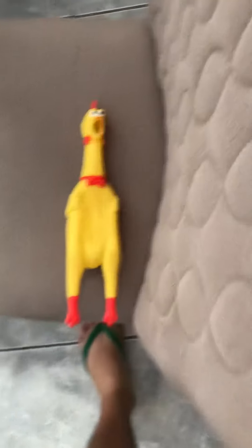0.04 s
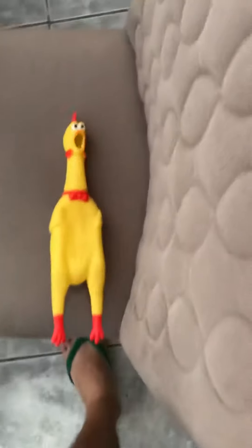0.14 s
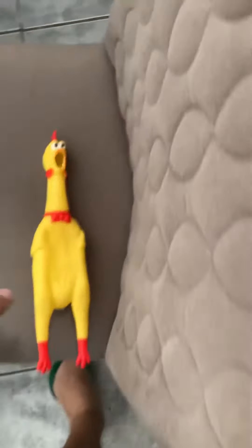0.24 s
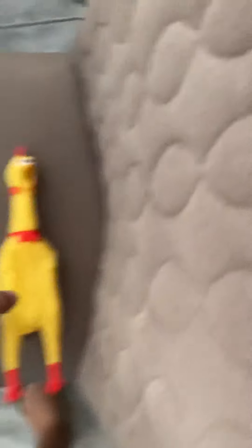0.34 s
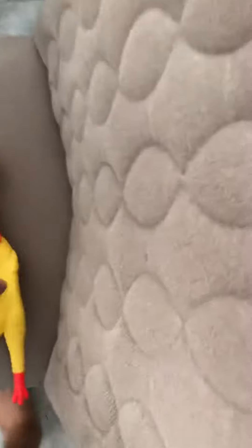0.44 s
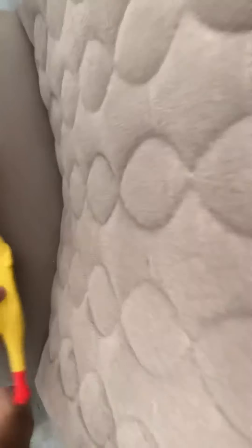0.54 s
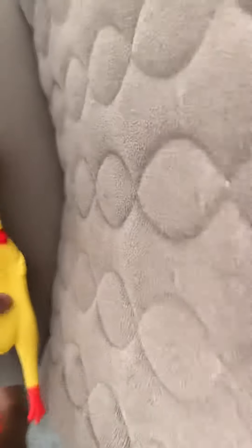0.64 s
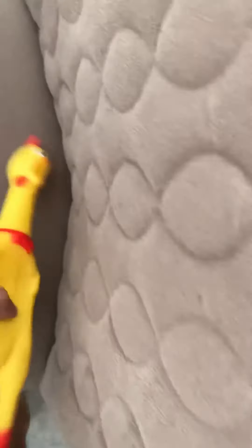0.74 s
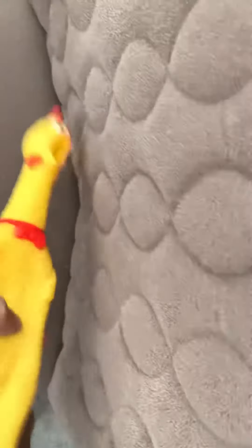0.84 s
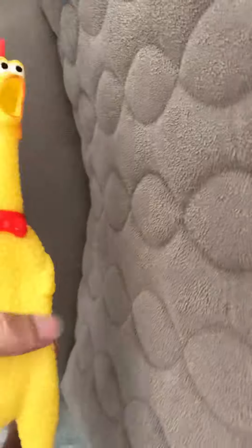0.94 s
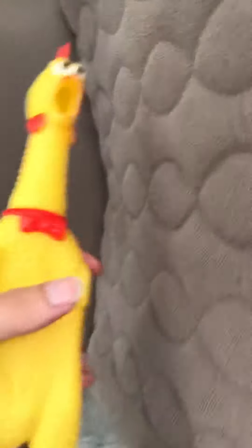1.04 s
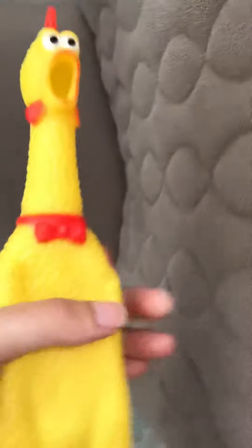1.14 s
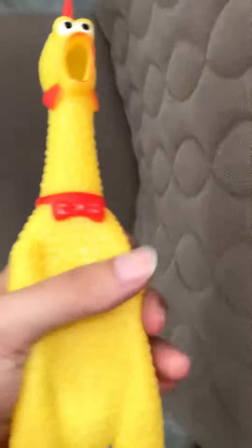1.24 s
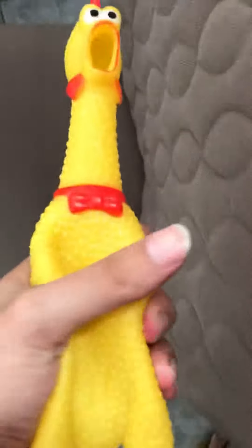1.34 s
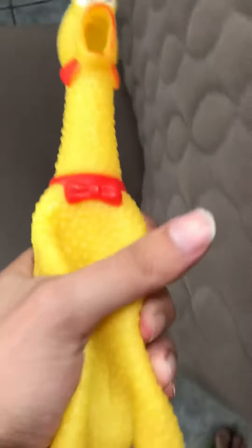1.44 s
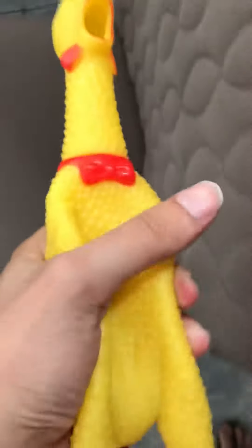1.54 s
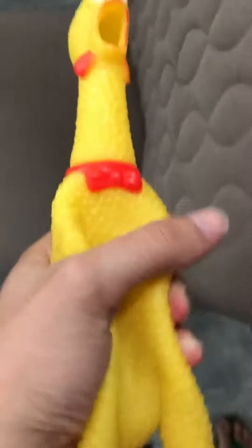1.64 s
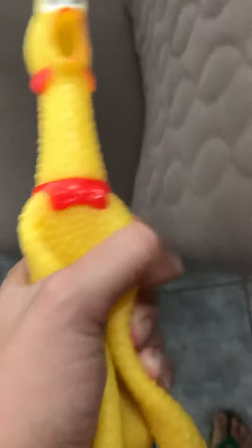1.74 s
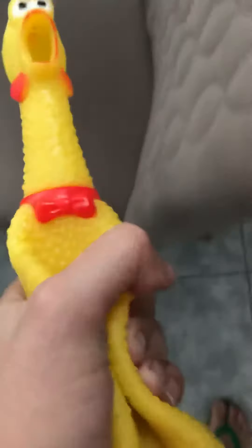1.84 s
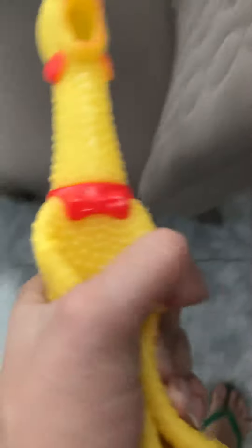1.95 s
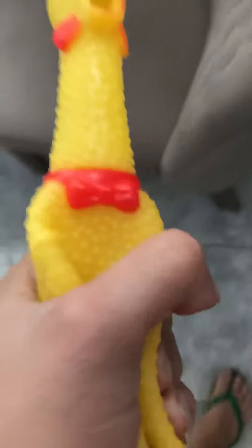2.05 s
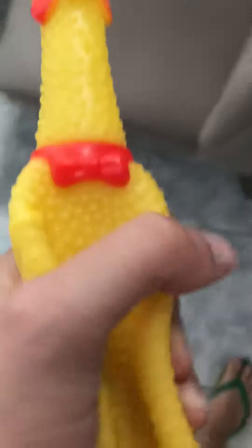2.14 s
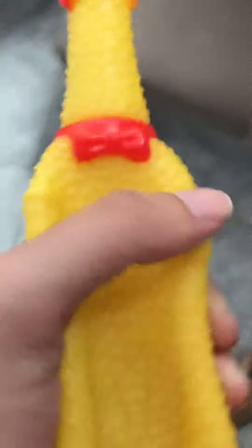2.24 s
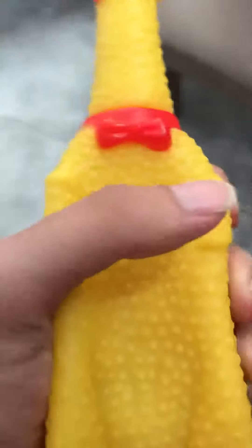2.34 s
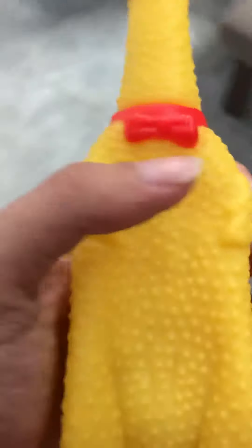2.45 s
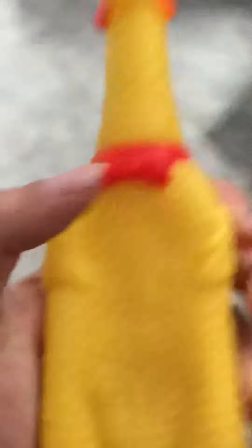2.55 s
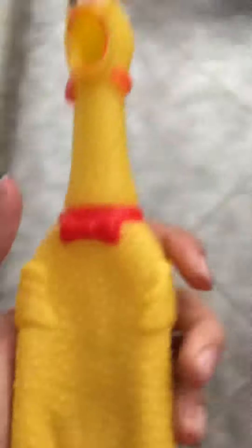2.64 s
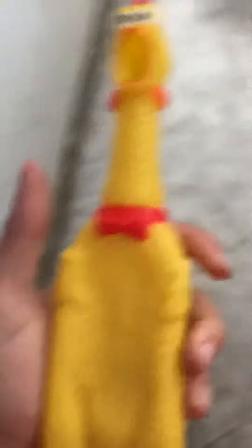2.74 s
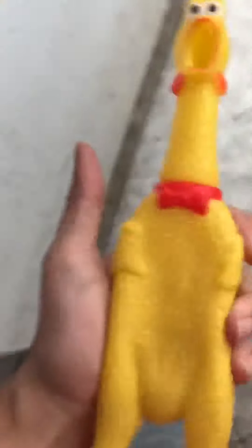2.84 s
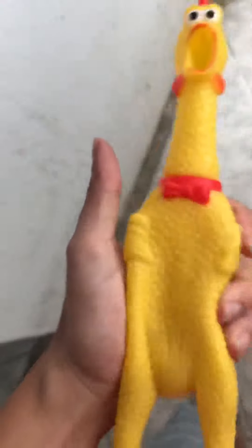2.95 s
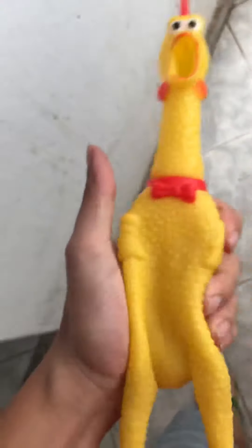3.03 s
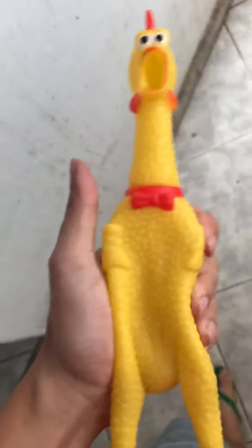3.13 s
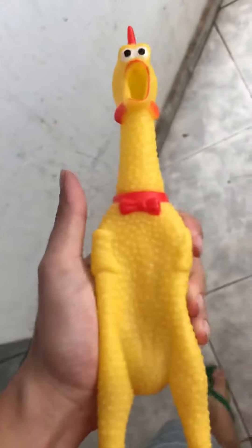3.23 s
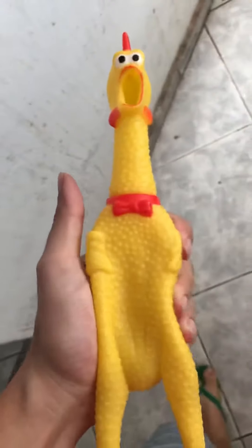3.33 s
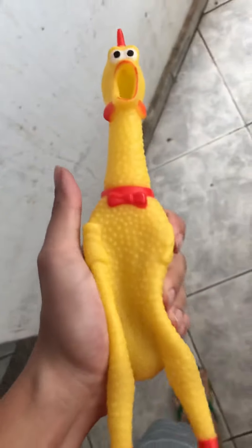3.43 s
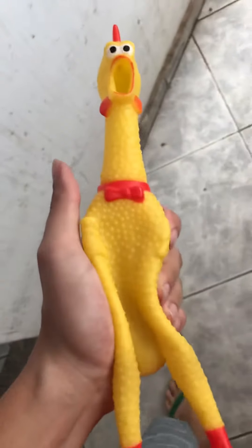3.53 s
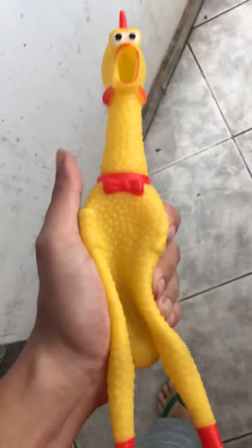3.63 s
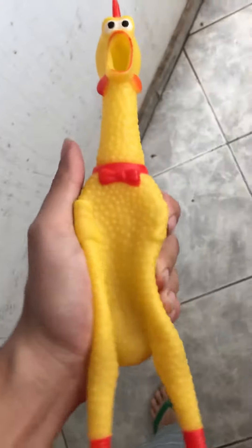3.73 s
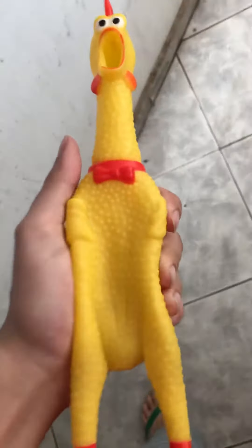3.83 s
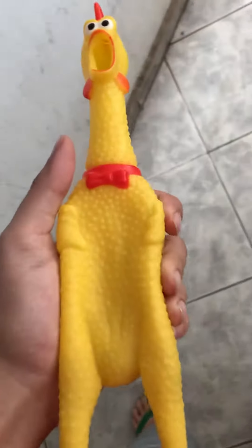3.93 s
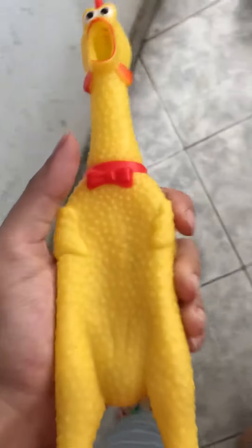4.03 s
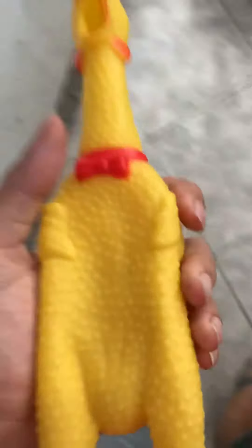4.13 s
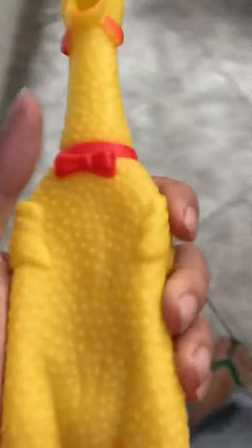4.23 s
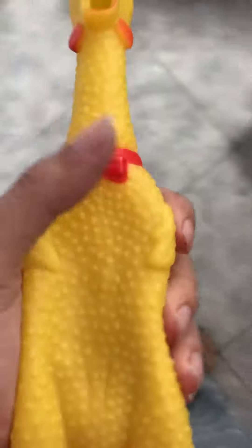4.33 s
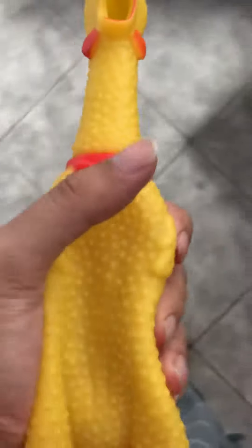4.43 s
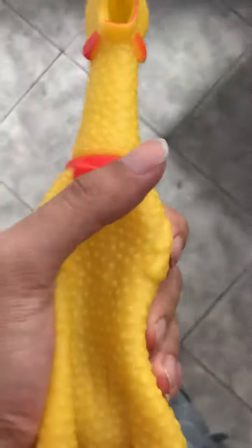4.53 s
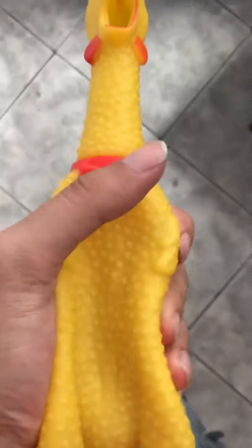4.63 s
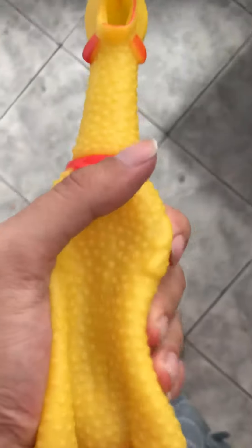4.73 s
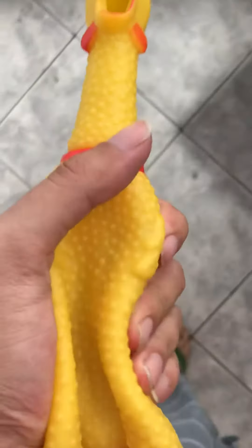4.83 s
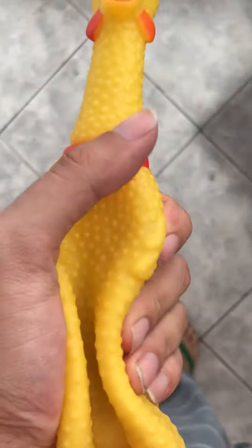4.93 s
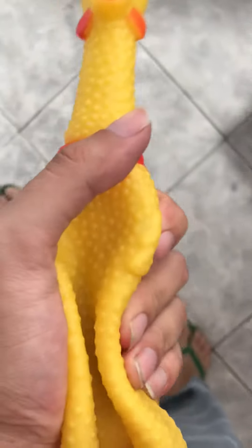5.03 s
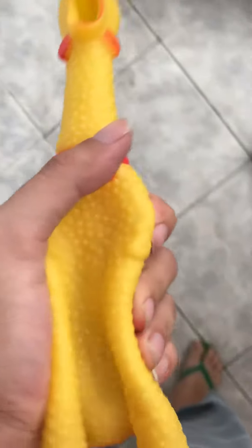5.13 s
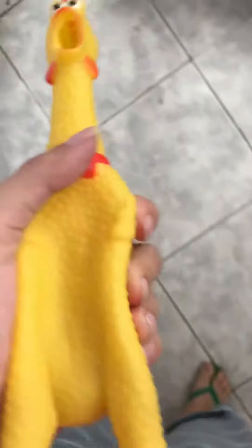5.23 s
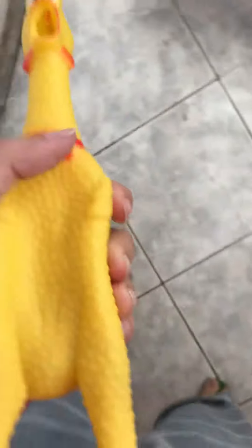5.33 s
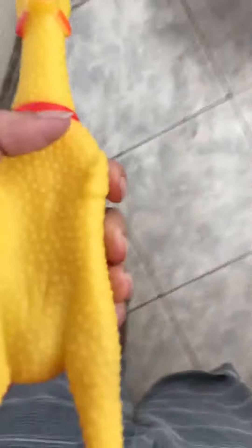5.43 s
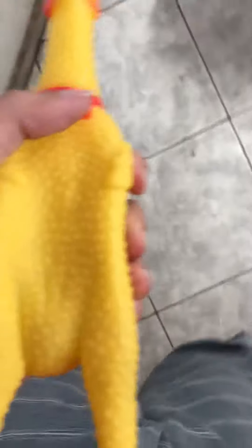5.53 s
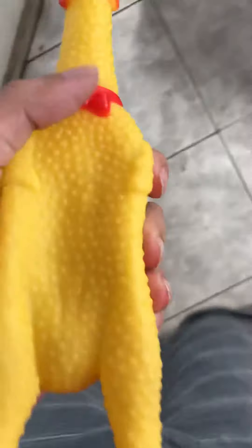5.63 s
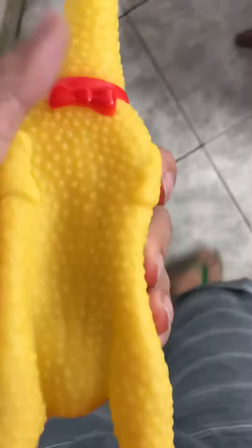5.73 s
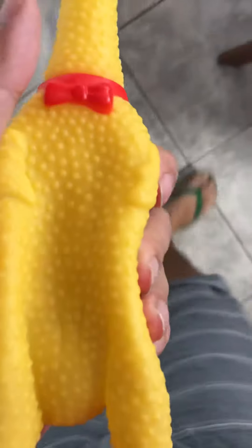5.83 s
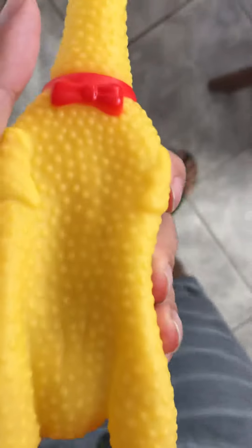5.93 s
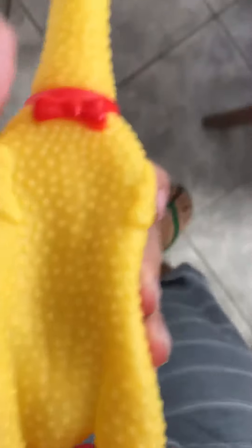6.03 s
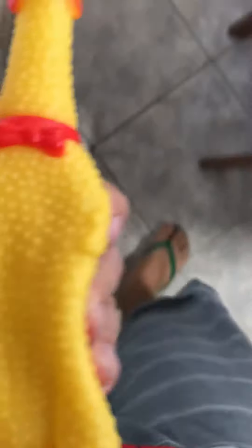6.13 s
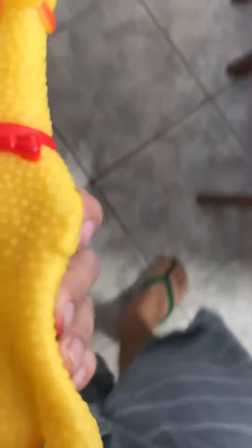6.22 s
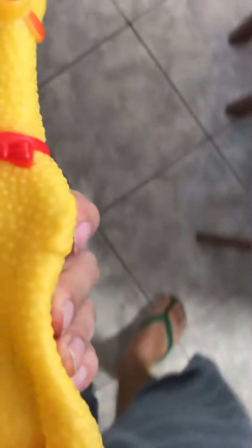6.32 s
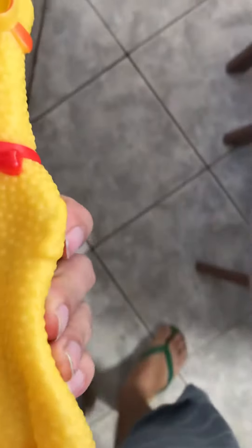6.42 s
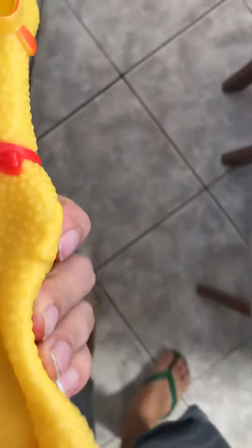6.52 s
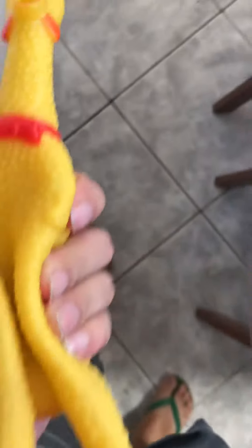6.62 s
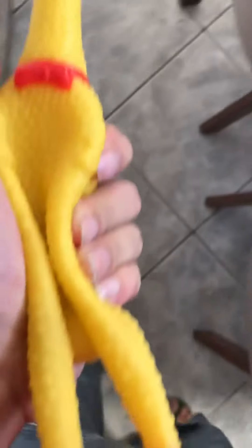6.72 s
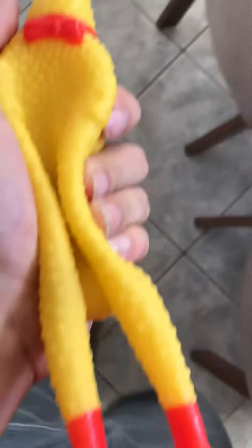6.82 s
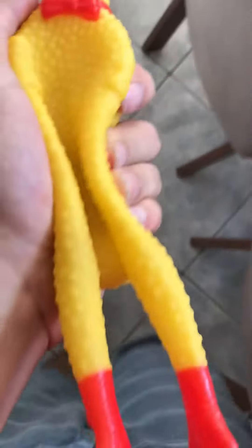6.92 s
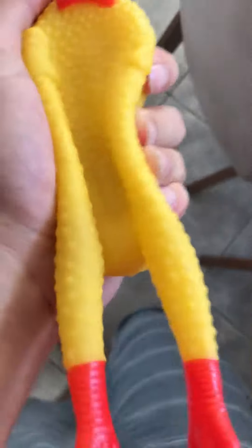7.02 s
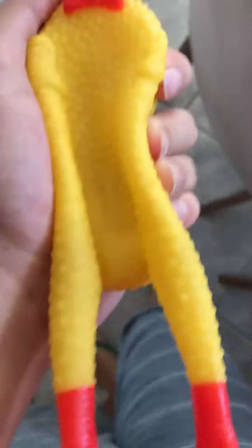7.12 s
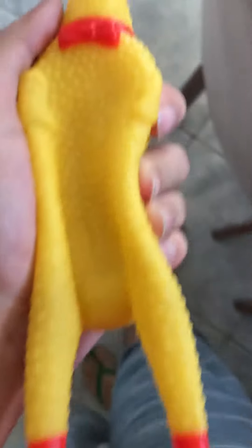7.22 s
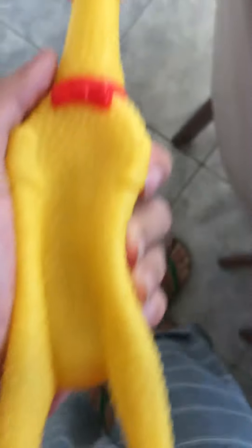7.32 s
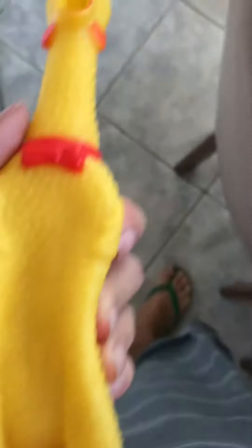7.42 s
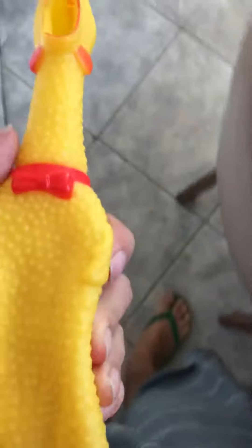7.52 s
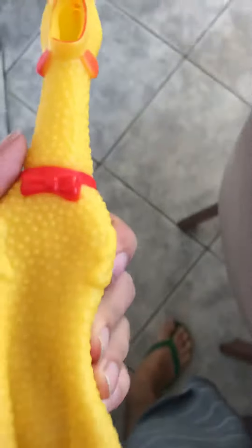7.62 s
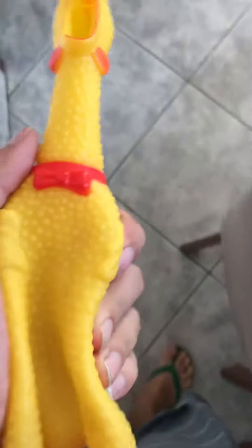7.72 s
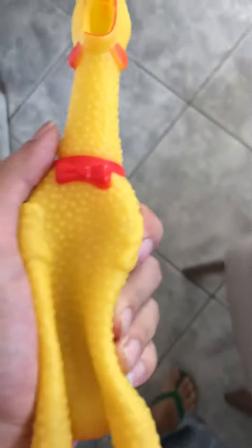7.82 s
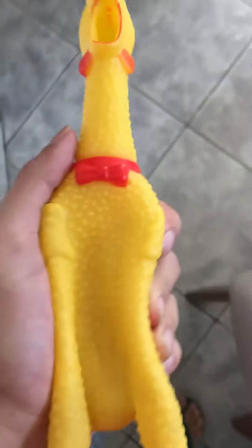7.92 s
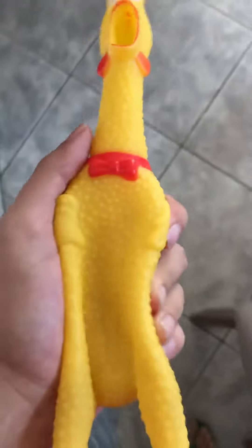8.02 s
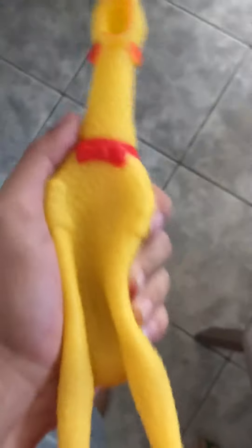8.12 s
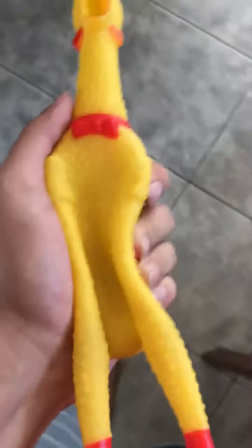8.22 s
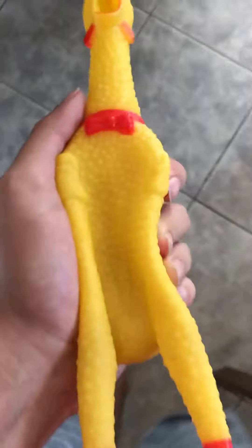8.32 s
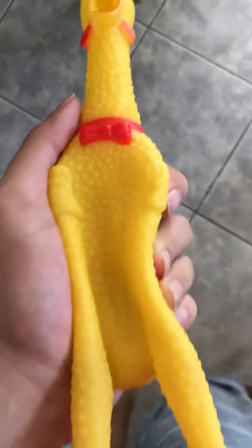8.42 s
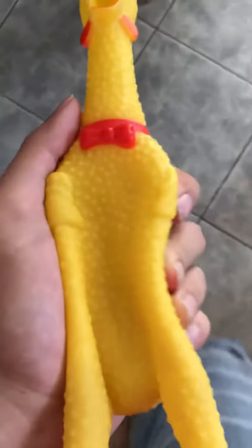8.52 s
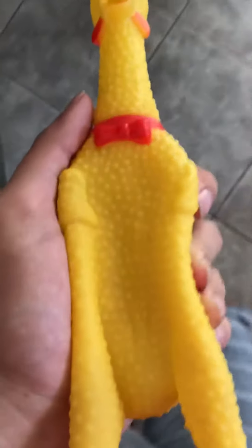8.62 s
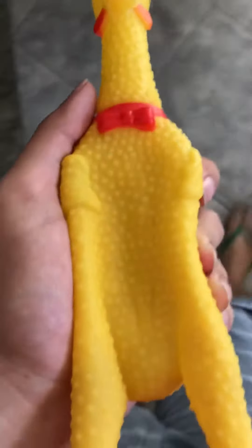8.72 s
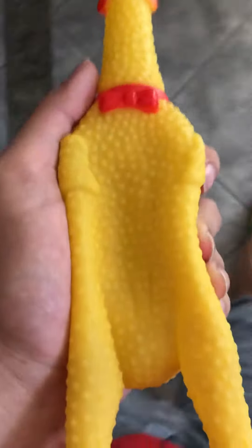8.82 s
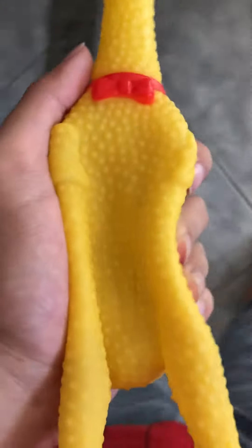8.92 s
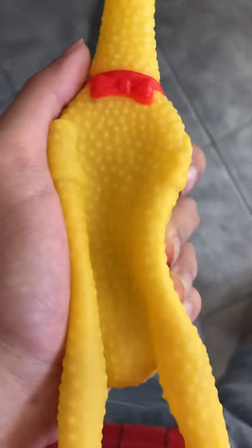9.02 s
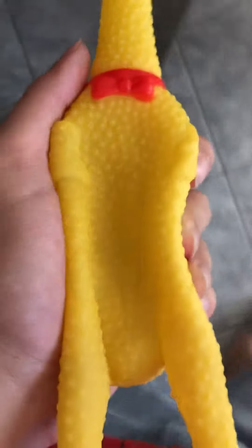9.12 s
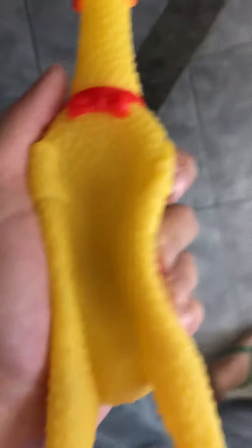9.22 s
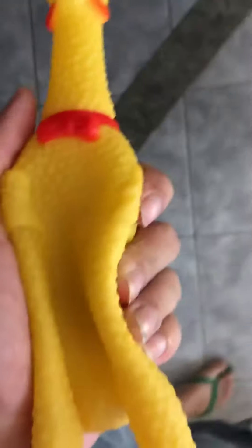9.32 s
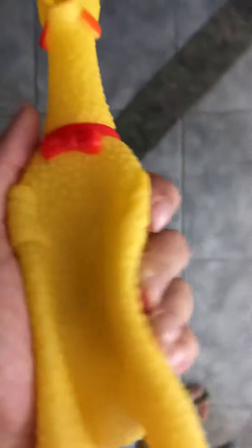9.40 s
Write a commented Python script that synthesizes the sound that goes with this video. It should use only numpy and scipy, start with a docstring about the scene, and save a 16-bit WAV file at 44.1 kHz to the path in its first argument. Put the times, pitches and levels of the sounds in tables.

```python
"""A soft rustle of cloth and faint whines open the scene, over a low hum and far traffic that never stop.
Then a rubber chicken is squeezed again and again, close to a phone in a tiled living room.
Air pushed out buzzes a reed in its neck, higher the harder the squeeze; from two seconds on, air sucked
back in sounds a lower, flatter groan between squeezes. The neck tube and beak colour both.
Meanwhile slow air hisses, the body knocks, the hand bumps the phone, and the hard room echoes the toy."""
import sys
import numpy as np
from scipy import signal
from scipy.fft import rfft, irfft
from scipy.io import wavfile
from scipy.ndimage import uniform_filter1d, map_coordinates

SR = 44100
rng = np.random.default_rng(int(sys.argv[2]) if len(sys.argv) > 2 else 0)


def store_wav(level_fs):
    """Save 16-bit WAV to argv[1]."""
    pcm = np.round(np.clip(np.atleast_2d(level_fs), -1, 1) * 32767)
    wavfile.write(sys.argv[1], SR, pcm.T.astype(np.int16))


N = 417186
TIME = np.arange(N) / SR


def chicken():
    """One reed sounds in both directions of flow: squeezed air out, drawn air in."""
    # squeezes: (start [s], crest [s], end [s], crest pitch aimed at [Hz], end pitch before choking [Hz],
    # hold [over 1 lingers at the crest], level offset [dB], fade over the stroke [dB],
    # shrillness offset [dB], low note boost [dB], top boost [dB])
    squeeze_rows = [ (0.605, 0.63, .722, 524.5, 476, .97, -1.5, 6, -2, 10, -5),
                    (1.259, 1.394, 1.492, 715, 507, .8, -0.5, 9.5, 0, 4.5, 4.5),
                    (1.614, 1.719, 1.978, 649.5, 495, .99, -1.5, 0.5, 0, 3.5, 2),
                    (2.903, 3.002, 3.102, 592, 504.4, .87, 1, 3, -0.5, 4.5, 2.5),
                    (3.337, 3.432, 3.64, 602.4, 506, .7, -0.5, 5.5, 0, 3, 2.5),
                    (4.395, 4.484, 4.585, 582.6, 496, .93, 1, 3.5, 1, 0.5, 2),
                    (4.727, 4.8, 5.02, 575.9, 496, 1.98, 1.5, 2.5, 0.5, 1, -0.5),
                    (6.111, 6.191, 6.312, 575.8, 492, .83, 2, 6.5, 0, 2, 1),
                    (6.483, 6.586, 6.752, 593, 480.4, .62, 0.5, 6.5, -1, 2, 0),
                    (7.617, 7.695, 7.836, 552.3, 490, 2.06, 2, 3.5, -0.5, 3.5, -0.5),
                    (8.046, 8.095, 8.218, 541.3, 485.4, .81, 0.5, 3, -.5, 2.5, -1),
                    (8.902, 8.955, 9.052, 552, 491, 1.05, 1.5, 4, 1, 3, -6),
                    (9.234, 9.274, 9.358, 541, 489, 1.04, 1, 4.5, 1.5, 1, -4), ]
    # refills as the body springs back, with the same columns:
    # (start [s], crest [s], end [s], crest pitch aimed at [Hz], end pitch before choking [Hz], hold [-],
    # level offset [dB], fade [dB], shrillness offset [dB], low note boost [dB], top boost [dB])
    refill_rows = [ (2.061, 2.222, 2.83, 543.8, 466.9, 0.31, -1.5, 3.5, 0.32, 5, 5),
                   (3.711, 3.802, 4.263, 490.1, 458.8, 1.82, -0.5, 1, -1.9, -6.5, 7.5),
                   (5.104, 5.195, 5.625, 504.5, 456, 1.17, -2.5, 3, 0.9, 3.5, 2),
                   (6.975, 7.044, 7.253, 486.8, 447, 0.9, -1.5, 7, -0.19, 0.5, -2),
                   (7.491, 7.497, 7.56, 471.6, 472, 1.25, 0.5, 4.5, -1.75, 2.5, 11),
                   (7.903, 7.958, 8.008, 486.4, 479, 1.42, -1, 1, -0.06, 2, 8),
                   (8.572, 8.655, 8.772, 477.3, 451, 0.96, -0.5, 4.5, -0.5, 1.5, 4),
                   (9.421, 9.444, 9.56, 486.7, 470, 1.2, 1.5, -2.5, -1.3, 0, 4), ]
    # pressure makes the reed higher and louder: (pitch [Hz], relative level [dB], relative shrillness [dB])
    drive_out = [(474, -26, -5), (528.6, -19, 0.5), (565, -16, -3), (592.5, -13.5, -2), (600, -11.5, -2.5),
                 (680, -9.5, -5.5), (760, -6.5, -9.5)]
    # the same for air drawn in: (pitch [Hz], relative level [dB], relative shrillness [dB])
    drive_in = [(405, -22, -17.5), (459.7, -19, -7), (483.5, -20, 0), (530, -15, -4.5)]
    # broad spectrum of the reed, air going out: (frequency [Hz], relative level [dB])
    reed_out = [(250, -24.5), (480, -6), (720, -2.5), (1000, 1), (1300, -7.5), (2000, -10), (2500, -23),
                (3300, -38), (4700, -21.5), (6000, -18), (8100, -35.5), (10500, -38), (13300, -44),
                (16000, -57)]
    # broad spectrum of the reed, air drawn in: (frequency [Hz], relative level [dB])
    reed_in = [(250, -27), (470, -5.5), (560, -7.5), (950, 2.5), (1400, -7), (2100, -17), (2700, -33.5),
               (4300, -34), (6000, -18.5), (7000, -39), (9000, -38.5), (11000, -44), (13300, -41.5),
               (16000, -60)]
    # resonances of neck tube and beak: (centre [Hz], width [Hz], lift blowing out [dB], lift drawing in [dB])
    neck = [(841, 108, 28, 19), (1858, 284, 10.5, 13.5), (3165, 270, 2, 12), (3825, 250, 9.5, 4),
            (4010, 86, 1, 10), (5180, 320, 18.5, 18), (5513, 393, 14.5, 13), (6443, 260, 16, 11.5),
            (7469, 420, 26, 24), (7833, 184, 19.5, 9.5), (8390, 220, 15.5, 10), (9440, 347, 18, 14),
            (9768, 228, 21.5, 16), (10470, 640, 11, 12.5), (11620, 450, 15.5, 4), (12750, 380, 11, 0),
            (14370, 560, 25.5, 3), (15400, 510, 17, 4)]
    # narrow changes to the squawk's spectrum, mostly dips:
    # (centre [Hz], width [Hz], change blowing out [dB], change drawing in [dB])
    dips = [(3930, 190, 0, -5), (6590, 190, 2, -10.5), (8700, 300, 5.5, -3), (12060, 600, 1, -12),
            (13160, 420, -9, -15), (13500, 300, 0, -9), (14760, 480, -17, -16)]

    squeezes = [stroke(row, drive_out, start_hz=516.3, rise=.844, round_s=.044,
                       choke=.026, choke_s=.012, kick_db=9, kick_s=0.001) for row in squeeze_rows]
    refills = [stroke(row, drive_in, start_hz=467, rise=4.1, round_s=.011,
                      choke=0.1, choke_s=.014, kick_db=2.5, kick_s=0.0032) for row in refill_rows]
    shape = neck + dips
    peaks_out = [(hz, width, lift) for hz, width, lift, _ in shape]
    peaks_in = [(hz, width, lift) for hz, width, _, lift in shape]
    out = reed(squeezes, reed_out, peaks_out, jitter=0.00133, rough=0.0037, chatter=0.02, air_db=-37,
               stall_s=0.0073, droop=0.056, whistle_db=-28, level_db=-0.21, shrill_db=-0.7)
    back = reed(refills, reed_in, peaks_in, jitter=0.00107, rough=.0008, chatter=0.0087, air_db=-51,
                stall_s=0.026, droop=0.1, whistle_db=-18, level_db=1.79, shrill_db=-0.5)
    return out + back


def stroke(row, drive, start_hz, rise, round_s, choke, choke_s, kick_db, kick_s):
    """Pressure climbs to a crest, eases off and chokes; pitch, level and shrillness follow it."""
    start, crest, end, crest_hz, end_hz, hold, db, fade_db, shrill, low_db, top_db = row
    t = np.linspace(start, end, num=400)

    def away(s):
        """Time from the crest, rounded off near it."""
        return np.hypot(s - crest, round_s) - round_s + 1e-12

    climb = (crest_hz - min(start_hz, crest_hz)) * (away(t) / away(start)) ** rise
    ease = (crest_hz - end_hz) * (away(t) / away(end)) ** hold
    hz = crest_hz - np.where(t < crest, climb, ease)
    hz = hz * (1 - choke * np.exp((t - end) / choke_s))
    # squeezed very hard, the reed is pulled up to one note (745 Hz) and stays there
    pull = np.interp(hz, [674, 700], [0, 1])
    hz = hz + (745 - hz) * pull
    pitches, levels, shrills = np.transpose(drive)
    # the reed's first swing is a dull pop
    kick = kick_db * np.exp((start - t) / kick_s)
    # the level drifts along the stroke, and shrillness with it, by 0.22 dB for each dB
    fade = fade_db * ((t - start) / (end - start) - .5)
    db = db + np.interp(hz, pitches, levels) + kick - fade
    shrill = shrill + np.interp(hz, pitches, shrills) - kick - 0.22 * fade
    return np.column_stack(np.broadcast_arrays(t, hz, db, shrill, low_db, top_db))


def reed(strokes, spectrum, peaks, jitter, rough, chatter, air_db, stall_s, droop, whistle_db,
         level_db, shrill_db, flutter_db=1.33):
    """The reed chops the air once a cycle; each pulse rings the neck and beak."""
    s, *columns = np.vstack(strokes).T
    hz, db, shrill, low_db, top_db = (np.interp(TIME, s, column) for column in columns)
    glide = np.gradient(hz, TIME)  # Hz per second
    spans = [(rows[0][0], rows[-1][0]) for rows in strokes]

    # the pitch sags as the air runs out and the reed stalls
    sag = sum(gate(end, end + stall_s, stall_s, 0.00185) for _, end in spans)
    hz = uniform_filter1d(hz * (1 - droop * sag), int(0.006 * SR)) * (1 + jitter * walk(60))
    phase = 2 * np.pi * np.cumsum(hz) / SR

    # the swing of the reed gives the clean honk
    honk = below(colour(pulse_train(phase, count=7), spectrum, peaks), 3000)
    honk = honk + (undb(low_db) - 1) * below(honk, 700)

    # it slaps shut unevenly until it settles after each start, and rattles while pressure changes fast
    scatter = sum(chatter * gate(start, start, 0.0011, 0.042) for start, _ in spans)
    rattle_rising, rattle_falling = 1.6e-5, 7e-6  # radians of scatter per Hz/s of glide
    rattle = np.maximum(rattle_rising * glide, -rattle_falling * glide)
    scatter = scatter + np.minimum(rattle, .04)
    slaps = pulse_train(phase + (rough + scatter) * walk(700), count=35)

    # turbulence escapes while the reed stands open
    air = undb(air_db) * rng.standard_normal(N) * (1 + np.cos(phase))
    rasp = colour(slaps + air, spectrum, peaks)
    rasp = rasp - below(rasp, 3000)
    rasp = rasp + (undb(top_db) - 1) * (rasp - below(rasp, 10500))

    # an upper bending mode of the reed whistles when the eighth harmonic falls onto it
    mode_hz, mode_width_hz = 3684, 128
    nearness = .5 ** ((2 * (8 * hz - mode_hz) / mode_width_hz) ** 2)
    whistle = undb(whistle_db) * np.sin(8 * phase) * nearness

    # the slapping stops first, the swing a moment later
    swinging = sum(gate(start, end, 0.0021, stall_s) for start, end in spans)
    slapping = sum(gate(start, end, 0.0044, 0.0014) for start, end in spans)
    swing = (steady(honk, 0.023, share=0.85) + whistle) * swinging
    edge = undb(shrill + shrill_db + .5 * walk(120) + flutter_db * walk(16))
    slap = steady(rasp, 0.06, share=0.23) * slapping * edge
    return (swing + slap) * undb(db + level_db)


def pulse_train(phase, count):
    """One sharp pulse a cycle: count harmonics of equal size."""
    return unit(np.sin((count + .5) * phase) / (2 * np.sin(phase / 2) + 1e-12) - .5)


def hisses():
    """Slow air and skin brushing the rubber make a soft, uneven hiss under and between the squawks."""
    # brushes of air and skin: (start [s], end [s], level before wavering [dB])
    brushes = [(1.153, 1.26, -57), (2.49, 2.85, -45), (2.899, 3.681, -42.5), (5.75, 5.815, -45),
               (6.443, 6.523, -45), (7.16, 7.474, -46), (8.751, 9.158, -51), (9.205, 9.36, -41)]
    # colour of the hiss: (frequency [Hz], relative level [dB])
    hiss_spectrum = [(300, -3), (900, 9.5), (2200, -7.5), (3000, -9.5), (5300, -2.5), (7300, -6.5),
                     (10000, -14.5), (16000, -27)]
    rise_s, fall_s = 0.029, 0.16
    size = sum(undb(db) * gate(start, end, rise_s, fall_s) for start, end, db in brushes)
    # a faint steady hiss from 1.15 s to the end
    size = size + undb(-56) * gate(1.15, TIME[-1], rise_s, fall_s)
    return unit(colour(rng.standard_normal(N), hiss_spectrum)) * size * undb(2.0 * walk(34))


def knocks():
    """The hollow body pops dully and its skin ticks as it buckles under the fingers."""
    # knocks of the body: (time [s], thud level [dB], tick level [dB], time to fade by 60 dB [s])
    knock_rows = [(2.045, -38, -48, .02), (2.216, -30, -43, 0.041), (6.926, -19.5, -30, 0.014),
                  (7.133, -17.5, -48, 0.056), (7.147, -34, -54, .08), (7.172, -29, -49, 0.098),
                  (7.2, -32, -54, 0.086), (7.239, -29, -56.5, .05), (7.37, -44, -40, 0.018),
                  (8.541, -33, -40, 0.029)]
    # colour of the thud: (frequency [Hz], relative level [dB])
    thud = [(100, -12), (350, -4.5), (800, 1.5), (1300, -14), (2200, -26), (5000, -40), (14000, -60)]
    # colour of the tick: (frequency [Hz], relative level [dB])
    tick = [(500, -29), (1500, -3), (3200, 4), (5000, -2), (9000, -16), (15000, -24)]
    fades = []
    for s, _, _, t60 in knock_rows:
        decay = np.exp(-np.log(1000) * np.clip((TIME - s) / t60, 0, 2))
        fades.append(decay * (TIME >= s))
    noise = rng.standard_normal(N)
    out = 0
    for levels, spectrum in zip(np.transpose(knock_rows)[1:3], (thud, tick)):
        blows = sum(undb(db) * fade for db, fade in zip(levels, fades))
        out = out + colour(noise * blows, spectrum) / np.std(colour(noise, spectrum))
    return out


def near_echo(x, lag_s=.0031, sway_s=0.000136, echo_db=-17):
    """A reflection off the holder's body; as the toy sways, single harmonics swell and fade."""
    return swaying_copy(x, lag_s, sway_s, 2.5, echo_db)


def wall_echo(x, lag_s=.0083, sway_s=0.000235, echo_db=-19):
    """The nearest hard surface reflects over a longer, swaying path, so high harmonics flutter."""
    return swaying_copy(x, lag_s, sway_s, 3, echo_db)


def top_flicker(x):
    """Top notes above 9 kHz, delayed and swaying; added to the squawk, they make its top swell and fade."""
    top = x - below(x, 9000)
    return swaying_copy(top, .0013, .00008, 2.5, -4)


def swaying_copy(x, lag_s, sway_s, sway_rate, copy_db):
    """A quieter copy whose delay wanders around lag_s."""
    return undb(copy_db) * map_coordinates(x, [(TIME - lag_s - sway_s * walk(sway_rate)) * SR], order=3)


def room(x, gap_s=0.0006, build_s=0.0047):
    """Hard walls and floor return a diffuse tail; each band of pitch dies away at its own rate."""
    # reverberation: (frequency [Hz], level [dB], time to fade by 60 dB [s])
    room_bands = [(255, -8, 0.8), (606, -13, 0.84), (970, -13.5, 0.79), (2140, -16.5, 0.66),
                  (3370, -7, 0.069), (5260, -14.5, 0.71), (8850, -16, 0.2), (15000, -33.5, .25)]
    t = TIME[:SR]
    noise = rfft(rng.standard_normal(SR))
    log_hz = np.log(np.arange(len(noise)) + 1)
    centres = np.log([row[0] for row in room_bands])
    tail = 0
    for share, (_, db, t60) in zip(np.eye(len(room_bands)), room_bands):
        # neighbouring bands cross-fade into each other
        band = irfft(noise * np.interp(log_hz, centres, share))
        decay = np.clip((t - gap_s) / build_s, 0, 1) * np.exp(-np.log(1000) * t / t60)
        tail = tail + undb(db) * band * decay / np.linalg.norm(decay)
    return signal.fftconvolve(x, tail)[:N]


def bumps():
    """The hand bumps the phone: low tones that swell and fade in soft, rounded thuds."""
    # bumps: (time [s], pitch [Hz], peak level [dB], length from the middle to 1/e [s])
    bump_rows = [(2.52, 68, -34.5, 0.02), (2.556, 92, -35.5, 0.037), (2.605, 120, -37, 0.016)]
    out = 0
    for s, hz, db, length in bump_rows:
        swell = np.exp(-((TIME - s) / length) ** 2)
        out = out + undb(db) * swell * np.sin(2 * np.pi * hz * TIME)
    return out


def rustle():
    """Cloth rubs evenly, as filtered noise, and dies away before the first squeeze."""
    # colour of the cloth: (frequency [Hz], relative level [dB])
    cloth = [(530, -38), (900, -7), (1080, -7.5), (1410, -12), (2170, -13.5), (4520, -16.5), (5220, -15),
             (6720, -14), (16000, -40)]
    rubbing = unit(colour(rng.standard_normal(N), cloth))
    return rubbing * undb(-44 + 0.97 * walk(14.4)) * gate(0, .35, 0.0024, 0.16)


def background():
    """Far traffic is filtered noise; appliances hum and faint far-off whines waver as plain tones."""
    # colour of the traffic: (frequency [Hz], relative level [dB])
    traffic = [(22, -35), (38, -9), (52, 10.5), (80, 3.5), (160, -2.5), (250, -2), (420, 2), (800, -4),
               (1300, -13), (2000, -14), (3000, -18.5), (6000, -19.5), (10000, -35.5), (16000, -42)]
    # appliances, as the holder walks from one toward another; the slow level below is added:
    # (pitch [Hz], relative level at the start [dB], relative level at the end [dB])
    appliances = [(51.6, -63, -51), (66, -53.5, -51.5), (122.4, -50.5, -65)]
    # whines: (start [s], end [s], pitch before wavering [Hz], level before wavering [dB])
    whine_rows = [(0, 0.53, 324, -56.5), (0, .42, 726, -51), (0, .16, 1130, -49), (0, .35, 782, -48),
                  (0.12, 0.302, 488, -48), (0.15, 0.524, 852, -49.5), (0, .39, 1057, -51),
                  (0.848, 1.077, 788, -54), (0.875, 1.15, 1265, -59)]
    # traffic and hum sink and return: (time [s], level change [dB])
    slow_level = [(0, 1), (1.25, -0.5), (1.45, -4.5), (3.6, -3), (7.3, 1.5), (8.3, -1.5), (9.46, 0.5)]

    rumble = unit(colour(rng.standard_normal(N), traffic)) * undb(-45 + .5 * walk(8.5))
    hum = 0
    for hz, first_db, last_db in appliances:
        loudness = undb(np.linspace(first_db, last_db, N) + 2.7 * walk(5.4))
        hum = hum + loudness * unit(np.sin(2 * np.pi * hz * TIME + .5 * walk(16.0)))
    whines = 0
    for start, end, hz, db in whine_rows:
        tone = unit(np.sin(2 * np.pi * np.cumsum(hz * (1 + 0.0065 * walk(14))) / SR))
        whines = whines + tone * undb(db + 3.3 * walk(20.6)) * gate(start, end - .05, 0.048, 0.09)
    return (rumble + hum) * undb(np.interp(TIME, *np.transpose(slow_level))) + whines


def undb(db):
    """Decibels to gain."""
    return 10 ** (np.asarray(db) / 20)


def unit(x):
    """Scale to an rms (average strength) of 1."""
    return x / np.sqrt(np.mean(x ** 2))


def spectrum_at(hz, points):
    """Read (frequency [Hz], level [dB]) points on a log-frequency axis."""
    f, db = np.transpose(points)
    return np.interp(np.log(hz + 1), np.log(f), db)


def colour(x, points, peaks=(), size=4096):
    """Filter that never sounds ahead of its input: a broad spectrum with narrow peaks or dips on it."""
    hz = np.arange(size // 2 + 1) * SR / size
    db = spectrum_at(hz, points)
    for centre, width, lift in peaks:
        db = db + lift * .5 ** ((2 * (hz - centre) / width) ** 2)
    # folding the cepstrum gives the minimum-phase response, which acts as early as possible
    cepstrum = irfft(np.log(undb(db)))
    cepstrum[1:size // 2] *= 2
    cepstrum[size // 2 + 1:] = 0
    response = irfft(np.exp(rfft(cepstrum)))
    return signal.fftconvolve(x, response)[:len(x)]


def below(x, hz):
    """Steep low-pass without delay."""
    return signal.sosfiltfilt(signal.butter(6, hz, fs=SR, output="sos"), x)


def walk(rate):
    """Smooth random wander of rms 1, heading for about rate new values a second."""
    k = max(int(SR / rate), 1)
    steps = np.repeat(rng.standard_normal(N // k + 1), k)
    return unit(uniform_filter1d(steps, k)[:N])


def gate(start, end, rise, fall):
    """Opens from start over rise seconds, closes after end over fall seconds."""
    end = max(end, start + rise)
    return np.interp(TIME, [start, start + rise, end, end + fall], [0, 1, 1, 0])


def steady(x, seconds, share):
    """Even out a share of the slow level changes; the remaining share still swells and fades."""
    x = unit(x)
    power = np.abs(uniform_filter1d(x ** 2, int(seconds * SR))) + 1e-12
    return x / power ** (share / 2)


def scene():
    """The toy, its echoes and the background reach one microphone, the same in both ears."""
    squawks = chicken()
    toy = squawks + hisses() + knocks()
    echoes = near_echo(toy) + wall_echo(toy) + room(toy)
    mono = toy + echoes + top_flicker(squawks) + rustle() + bumps() + background()
    return np.array([mono, mono])


def record(dry):
    """The phone clips at full scale and cuts the top above 16 kHz."""
    top_cut = signal.ellip(8, .1, 60, 16000, fs=SR, output="sos")
    return signal.sosfiltfilt(top_cut, np.clip(dry, -1, 1))


dry = scene()
out = record(dry)
store_wav(out)
```